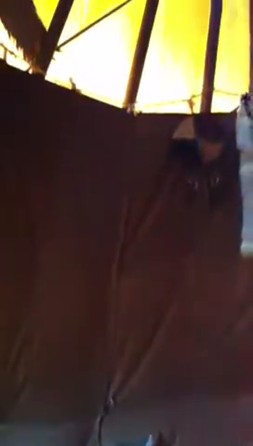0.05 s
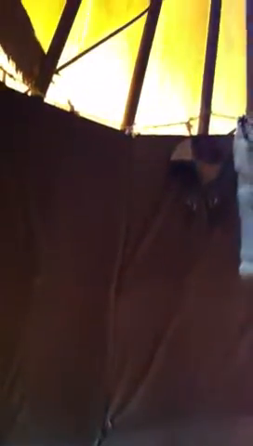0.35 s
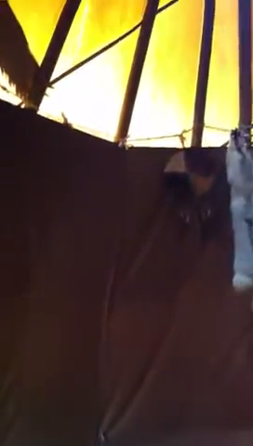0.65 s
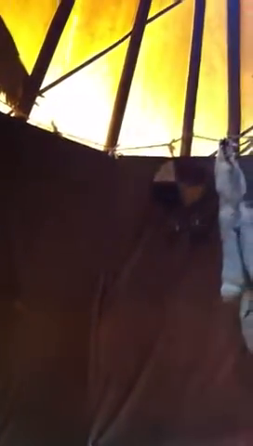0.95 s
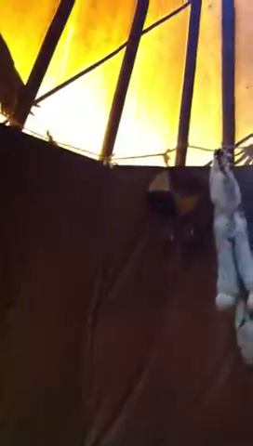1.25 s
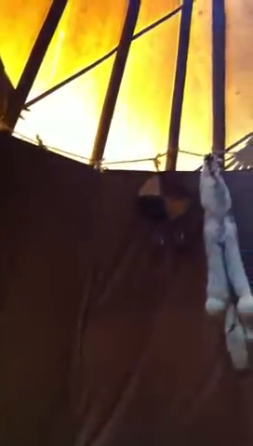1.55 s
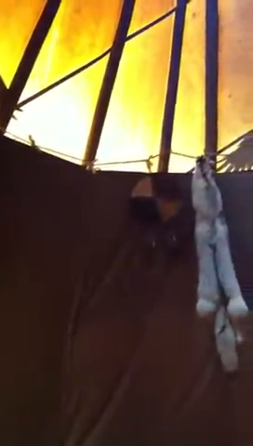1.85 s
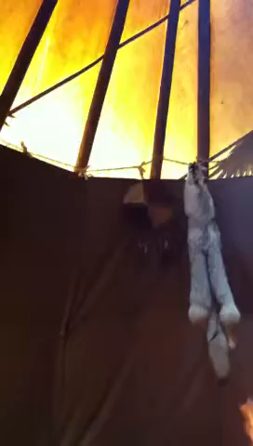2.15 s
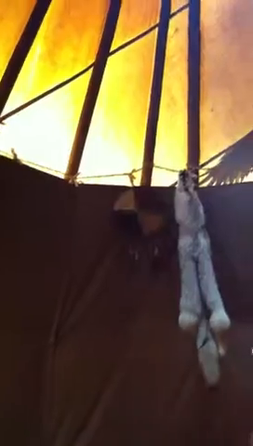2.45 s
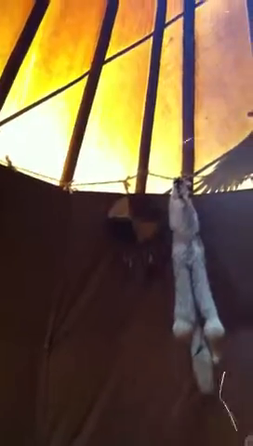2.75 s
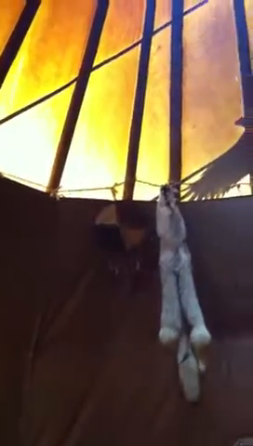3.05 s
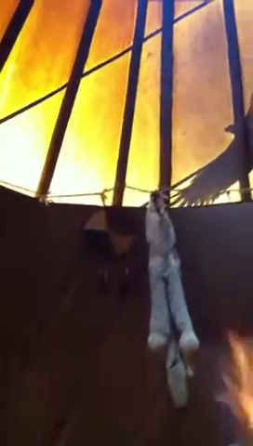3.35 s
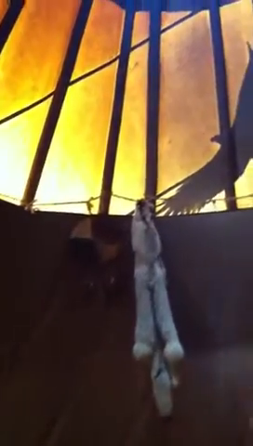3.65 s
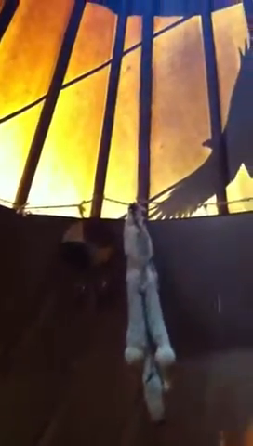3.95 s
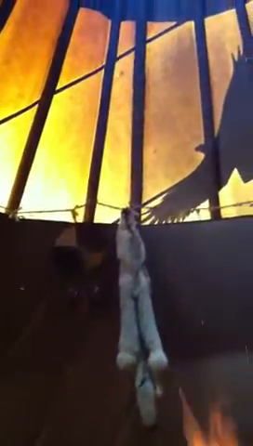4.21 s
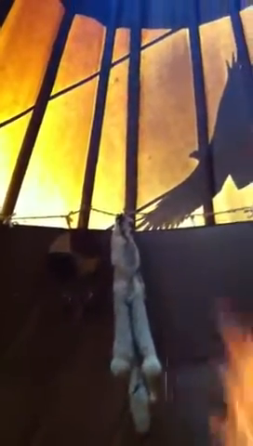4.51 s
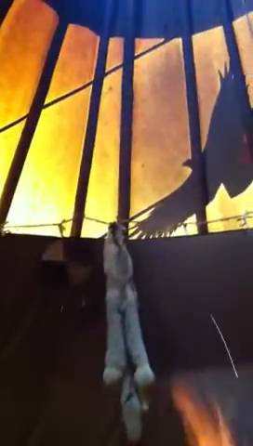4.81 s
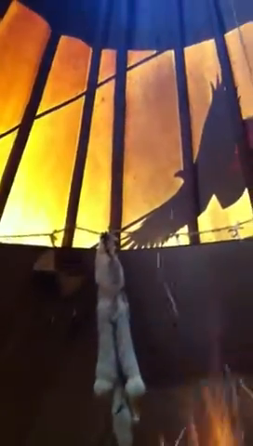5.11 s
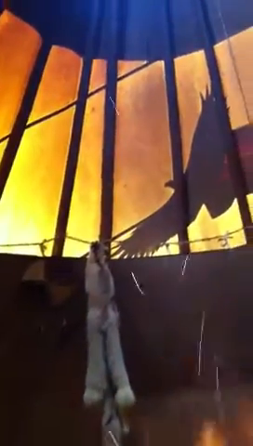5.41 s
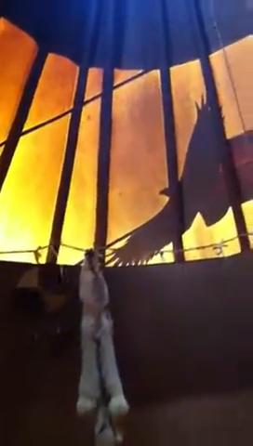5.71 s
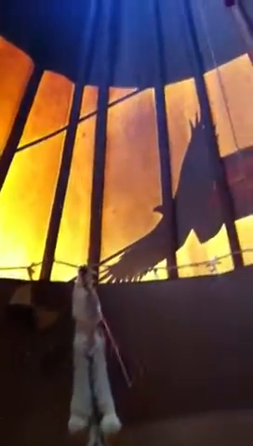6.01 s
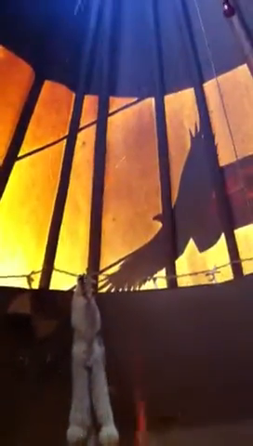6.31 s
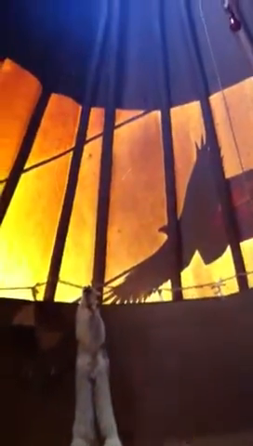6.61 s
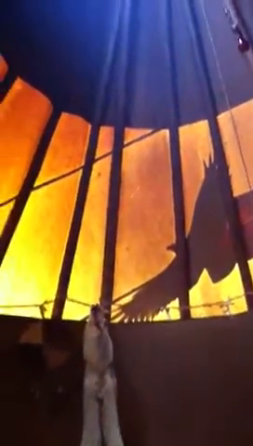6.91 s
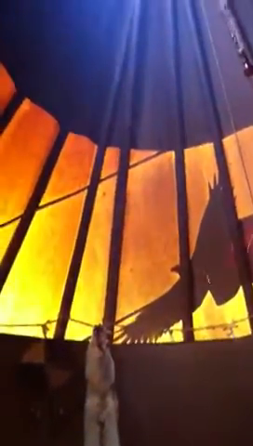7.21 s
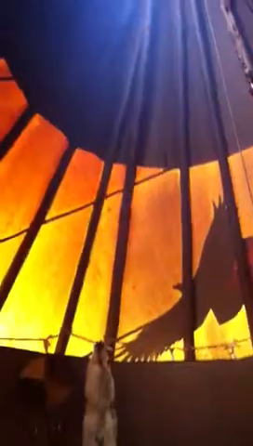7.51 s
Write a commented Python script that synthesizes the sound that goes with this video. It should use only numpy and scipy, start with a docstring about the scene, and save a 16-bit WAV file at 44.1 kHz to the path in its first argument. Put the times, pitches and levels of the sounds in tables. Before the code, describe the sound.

Close burning logs hiss and snap irregularly inside a canvas tent, while a far engine hums faintly under a low roar.

```python
"""A log fire burns in a large canvas tent, close to a phone. From the start a low roar and something like
a distant engine lie under fluttering flames and sizzling sap. Pockets of steam burst in the wood and
echo off the ground and the canvas; a hard pop comes almost at once. Near 3.1 s a slit sputters steam.
After 4.2 s the engine briefly speeds up, and at 4.7 s comes the hardest pop. The phone's gain control
ducks after each of these two hard pops and creeps back."""
import sys
import numpy as np
from scipy import signal
from scipy.fft import rfft, irfft, next_fast_len
from scipy.io import wavfile
from scipy.ndimage import uniform_filter1d

SR = 44100
rng = np.random.default_rng(int(sys.argv[2]) if len(sys.argv) > 2 else 0)


def dump(signal):
    """Clip the signal to [-1, 1] and save it as 16-bit WAV at the path in sys.argv[1]."""
    limited = np.clip(np.atleast_2d(signal).T, -1, 1)
    pcm = np.round(limited * 32767).astype(np.int16)
    wavfile.write(sys.argv[1], SR, pcm)


N = 333383
TIME = np.arange(N) / SR


def undb(db):
    """Amplitude ratio of a level in decibels."""
    return 10 ** (np.asarray(db) / 20)


def unit(x):
    """Normalisation to rms 1."""
    return x / np.sqrt(np.mean(x ** 2))


def unit_energy(x):
    """Normalisation to energy 1."""
    return x / np.sqrt(np.sum(x ** 2))


def curve(table):
    """Linear interpolation of (time, value) rows, one value a sample."""
    return np.interp(TIME, *np.transpose(table))


def colour(x, spectrum):
    """Spectral shaping by (Hz, dB) points; rms 1."""
    hz, db = np.transpose(spectrum)
    size = next_fast_len(N)
    freqs = np.maximum(np.fft.rfftfreq(size, 1 / SR), 1)
    gain = undb(np.interp(np.log(freqs), np.log(hz), db))
    return unit(irfft(rfft(x, size) * gain, size)[:N])


def walk(rate):
    """Random modulation: values held for 1 / rate seconds and smoothed twice; rms 1."""
    hold = max(int(SR / rate), 1)
    steps = rng.standard_normal(N)[np.arange(N) // hold]
    return unit(uniform_filter1d(uniform_filter1d(steps, hold), hold))


def resonate(x, hz, q):
    """Forced response of a damped resonator."""
    w = 2 * np.pi * min(hz, .44 * SR) / SR
    loss = np.sin(w) / (2 * q)
    return signal.lfilter([loss, 0, -loss], [1 + loss, -2 * np.cos(w), 1 - loss], x)


def ring(hz, q, size=400):
    """Impulse response of a damped resonator; energy 1."""
    return unit_energy(resonate(signal.unit_impulse(size), hz, q))


def rumble(outside_db, roar_db=-54.6, roar_share=0.31, throb_db=1.2, drone_db=-75, rise_db_per_s=2.2):
    """Low-frequency noise roars around the tent; two faint, randomly modulated tones slowly grow in it."""
    # Each row: frequency in Hz, relative spectral density in dB.
    spectrum = [(20, -33), (45, -26), (70, -18.5), (95, -10.5), (130, 0.5), (180, -0.5), (240, -1),
                (285, -8), (360, -19.5), (700, -31.5)]
    roar = colour(rng.standard_normal(N), spectrum)
    roar *= undb(roar_db + roar_share * outside_db + throb_db * walk(8))
    drone = sum(np.sin(2 * np.pi * hz * TIME + 0.66 * walk(5)) * undb(db + 2 * walk(6))
                for hz, db in [(120, 0), (86, -6)])
    return roar + drone * undb(drone_db + rise_db_per_s * TIME)


def engine(outside_db, idle_hz=50.47, waver_db=2.4, drift=0.0043):
    """A far periodic source: only low harmonics pass the canvas, wavering; speed makes it louder."""
    # Each row: time in seconds, cycle rate in Hz.
    speed = [(0, 50.9), (.6, 51.17), (1.4, 50.1), (4.2, 50.42), (4.95, 52.7), (5.55, 52.27), (6.1, 50.35),
             (7.5, 50.7)]
    # Each row: harmonic number, base level in dB, dB gained per Hz over idle, share of the outside level.
    harmonics = [(2, -67, 0, 0), (3, -54.5, 4, .7), (4, -56.5, -.6, 1.6)]
    hz = curve(speed)
    phase = 2 * np.pi * np.cumsum(hz * (1 + drift * walk(9))) / SR
    hum = np.zeros(N)
    for k, db, db_per_hz, share in harmonics:
        level_db = db + db_per_hz * (hz - idle_hz) + share * outside_db
        hum += unit(np.sin(k * phase)) * undb(level_db + waver_db * walk(10))
    return hum


def flames(start_db=-59.5, growth_db_per_s=.45, flutter_db=0.85, eddy_db=1.86, swell_db=4.0):
    """Burning gas makes a turbulent rush; flame tongues excite a cavity resonance between the logs."""
    # Each row: frequency in Hz, relative spectral density in dB.
    spectrum = [(250, -16), (370, -4), (490, -1.5), (700, -0.5), (950, -0.5), (1400, -3), (2500, -6.5),
                (5000, -18.5), (10000, -42)]
    # Each row: time in seconds, level of the tongues in dB relative to the rush.
    tongue_levels = [(0, -12), (2.9, -5), (5.3, -12), (7.5, -10)]
    rush = colour(rng.standard_normal(N), spectrum) * undb(flutter_db * walk(10) + eddy_db * walk(70))
    hollow = unit(resonate(rng.standard_normal(N), hz=500, q=4))
    tongues = hollow * undb(curve(tongue_levels) + swell_db * walk(12))
    return unit(rush + tongues) * undb(start_db + growth_db_per_s * TIME)


def sizzle(blisters_per_s=700, scatter_db=3, grain_db=-7):
    """Boiling sap gives broadband steam hiss and the shot noise of tiny bursting blisters."""
    # Each row: frequency in Hz, relative spectral density in dB.
    spectrum = [(900, -16.5), (2000, -8), (3500, -4), (5000, -3.5), (6300, -1), (7500, -2), (9500, -0.5),
                (12500, -1), (15500, -1.5)]
    # The sizzle thins as the flames grow. Each row: time in seconds, level in dB.
    levels = [(0, -46.7), (.5, -48.5), (2.5, -48.7), (4.2, -47), (5.5, -47.7), (6.6, -50.5), (7.5, -49.2)]
    sizes = undb(scatter_db * np.minimum(rng.exponential(size=N), 4)) * rng.choice([-1, 1], N)
    blisters = unit((rng.random(N) < blisters_per_s / SR) * sizes)
    steam = rng.standard_normal(N) * undb(.35 * walk(35))
    return colour(steam + undb(grain_db) * blisters, spectrum) * undb(curve(levels))


def tent_echo(hz, ground_gain=0.29, ground_lag_s=0.0051, first_density=.15, dense_s=.02):
    """Reverberation: a ground bounce and sparse reflections merge into a diffuse wash; energy near 1."""
    # The hearth, then the canvas wall. Each row: delay in seconds, spread in seconds, relative level in dB.
    reflectors = [(.004, .0065, -2), (0.0246, .0045, -2)]
    wash_db, build_s, t60_s = 1, 0.038, 0.18
    t = TIME[:SR // 7]
    wash = np.minimum(t / build_s, 1) * undb(wash_db - 60 * t / t60_s)
    early = [undb(db) * np.exp(-((t - delay) / spread) ** 2) for delay, spread, db in reflectors]
    envelope = np.linalg.norm([wash, *early], axis=0)
    density = np.minimum(first_density + (t / dense_s) ** 2, 1)
    arrivals = (rng.random(len(t)) < density) * rng.standard_normal(len(t)) / np.sqrt(density)
    absorbed_db = 170 * t * (hz / 10000) ** 2  # canvas absorbs treble, so bright bursts die sooner
    echo = unit_energy(arrivals * envelope * undb(-absorbed_db))
    echo[int(ground_lag_s * SR * rng.uniform(.9, 1.1))] += ground_gain
    return echo


def crackle(ticks_per_s=14, top_db=-18, range_db=16, echo_db=-2):
    """Splitting charcoal ticks in three sizes, each a Poisson process; most ticks are faint."""
    out = np.zeros(N)
    for hz, q, size_db in [(2570, 0.8, -6.0), (7040, 1.0, -1.5), (12200, 1.9, 1.0)]:
        chance, depth = rng.random((2, N))
        ticks = (chance < ticks_per_s / SR) * undb(top_db + size_db - range_db * np.sqrt(depth))
        path = undb(echo_db) * tent_echo(hz)
        path[0] += 1  # direct sound
        out += signal.fftconvolve(ticks, signal.fftconvolve(path, ring(hz, q)))[:N]
    return out


def steam_jet(start_s=3.096, length_s=0.032, level_db=-35, slit_hz=12600, q=1.7, sputter_db=3):
    """Jet noise: one burst opens a slit, and steam sputters out until its pressure is spent."""
    age = np.maximum(TIME - start_s, 0) / length_s
    pressure = (age > 0) / (1 + age ** 4)
    hiss = unit(resonate(rng.standard_normal(N), slit_hz, q))
    return hiss * pressure * undb(level_db + sputter_db * walk(400))


def pops(tear_db=-11, tear_s=0.00038, lead_s=.0003, echo_db=-1, off_axis_db=-13, knock_db=-15):
    """Impulsive excitation: the log cracks, the burst cavity rings as fibres tear, the tent reflects."""
    # Each row: start in seconds, ring energy in dB, ring frequency in Hz, ring Q,
    # the log's crack in dB relative to the ring, relative echo level in dB before echo_db is added.
    bursts = [ (.1447, 9.5, 8750, 3.4, -22, -12.5), (.1864, -12, 6000, .6, -7, -6),
              (.343, -13, 12900, 2, -24, -7), (0.4516, -13.5, 12200, 1.2, -24, -1),
              (.5762, -10.5, 9500, 1.2, -11, -1), (1.0978, -13, 3100, 1.2, -12, -3),
              (1.1427, -15.5, 12300, 2, -10, -1), (1.1912, -17, 12300, 1.5, -24, -6),
              (1.2499, -20, 1800, .6, -24, -1), (1.3786, -12, 4230, .6, -9, 0),
              (1.543, -10, 12000, 1.6, -16, 1), (1.637, -21.5, 4200, .4, -10, 2),
              (1.8996, -20, 5000, .5, -9, 3), (2.1317, -2.7, 3300, .7, -26, -1.2),
              (2.1503, -13.5, 6400, .6, -8, -6), (2.267, -22.5, 6500, 2, .5, -2),
              (2.439, -8.5, 8000, 1.8, -2, -.5), (2.5246, -16, 9300, 0.38, -21, -10),
              (2.6855, -15.5, 10690, 1, -24, -5), (2.9222, -22, 1725, 1.1, -24, 0),
              (2.9844, -18, 12400, 1.8, -20, -12), (3.0939, -5.5, 12410, 4, -20, -0.5),
              (3.1142, -6.5, 13400, 1.3, -22, -4), (3.1555, -18, 4200, .7, -24, 0),
              (3.2015, -16, 11700, 1.5, -7.5, -1), (3.5308, -19, 5800, .6, -24, 2.5),
              (3.5748, -22.5, 1730, .5, -24, 2.5), (4.1126, -4, 13000, 3, -10.5, -5),
              (4.481, -8, 9780, 1.2, -22, -7), (4.6864, -7, 6300, 5, 2.5, 2.5),
              (4.7318, 14, 5650, .56, -13, 1.5), (4.845, -13, 12800, 1.6, -6, -6),
              (4.9306, -12.5, 9300, .7, -3.5, -5), (5.5356, -18.5, 11200, .5, -16, 0),
              (5.5721, -8.5, 8900, 1.3, -20, -8), (5.8012, -17, 2610, 0.52, -11, 0),
              (5.9652, -19, 4790, 1, -10, 2), (6.0144, -20, 5200, .7, -7, 0),
              (6.1714, -21.5, 6700, 1.2, -9, 1), (6.2779, -21, 2100, 2, -3, -5),
              (6.6819, -21, 6100, 1.5, -17, 0), (6.7738, -1.5, 7950, 1.2, -10, -7),
              (7.3141, -20.5, 5000, .8, -10, 0), (7.4611, -17.5, 5995, .9, -17, 2.5)]
    log_hz, knock_hz = 2400, 750
    log, knock = ring(log_hz, q=0.48), ring(knock_hz, q=1)
    out = np.zeros(N + SR)
    t = TIME[:SR // 100]
    lead = np.zeros(int(lead_s * SR))
    for start_s, db, hz, q, crack_db, wet_db in bursts:
        snap = ring(hz, q)
        tearing = undb(tear_db) * unit_energy(rng.standard_normal(len(t)) * t * np.exp(-2 * t / tear_s))
        tearing[0] = 1
        clean = np.r_[lead, snap] + undb(crack_db) * np.r_[log, lead]
        direct = unit_energy(np.convolve(tearing, clean)) * np.linalg.norm(clean)
        # the tent also gathers the duller sound that the log radiates sideways, with its low knock
        wood_gain = np.hypot(undb(crack_db), undb(off_axis_db))
        parts = [(hz, snap), (log_hz, wood_gain * log), (knock_hz, wood_gain * undb(knock_db) * knock)]
        burst = undb(wet_db + echo_db) * sum(np.convolve(tent_echo(f), part) for f, part in parts)
        burst[:len(direct)] += direct
        start = int(start_s * SR) - len(lead)
        out[start:start + len(burst)] += undb(db) * burst
    return out[:N]


def scene():
    """Superposition of all sources at one microphone, the same in both channels."""
    # Low sound from outside, followed by engine and roar. Each row: time in seconds, relative level in dB.
    outside_levels = [(0, -5), (1, -8), (2.8, -6.5), (4.4, 1.5), (5.1, -.5), (5.8, 1), (7.5, -2)]
    outside_db = curve(outside_levels)
    fire = pops() + steam_jet() + crackle() + sizzle() + flames()
    mono = fire + engine(outside_db) + rumble(outside_db)
    return np.array([mono, mono])


def gain_control(x, ceiling_db=-12.5, release_db_per_s=6.5):
    """Limiting: the gain drops at once when a millisecond of sound passes the ceiling, then climbs back."""
    power = uniform_filter1d(x[0] ** 2, size=44)
    over_db = np.maximum(10 * np.log10(np.maximum(power, 1e-12)) - ceiling_db, 0)
    climb_db = release_db_per_s * TIME
    return x * undb(climb_db - np.maximum.accumulate(over_db + climb_db))


def record(dry):
    """The phone limits the level, then the bandwidth."""
    top_hz = 15900
    low_pass = signal.ellip(10, .2, 70, top_hz, fs=SR, output="sos")
    return signal.sosfilt(low_pass, gain_control(dry))


dry = scene()
out = record(dry)
dump(out)
```